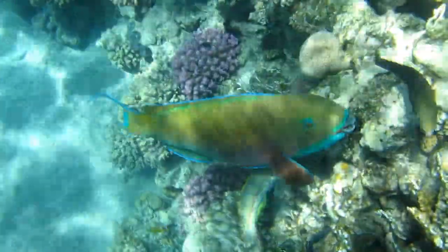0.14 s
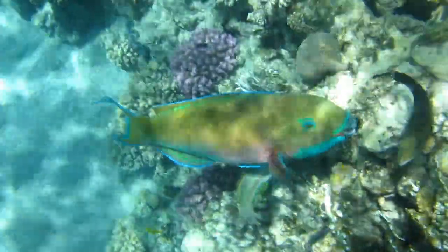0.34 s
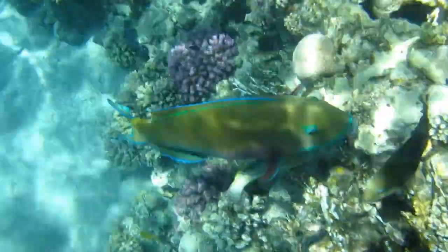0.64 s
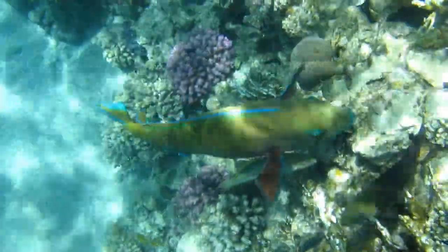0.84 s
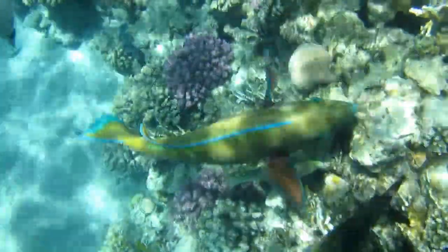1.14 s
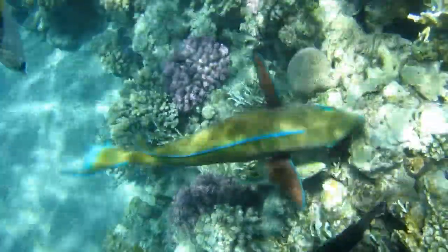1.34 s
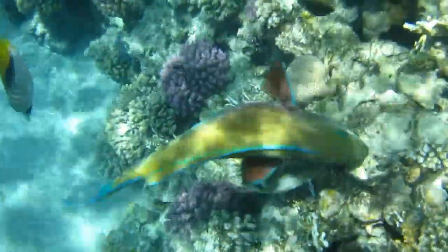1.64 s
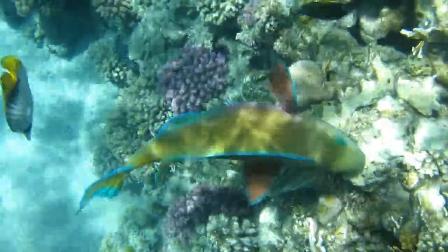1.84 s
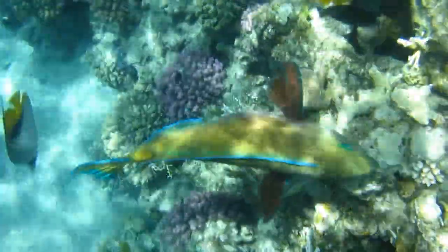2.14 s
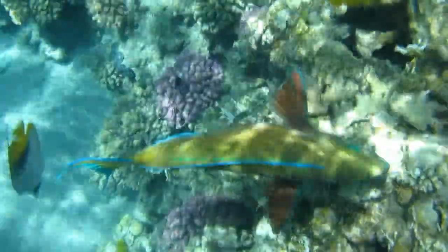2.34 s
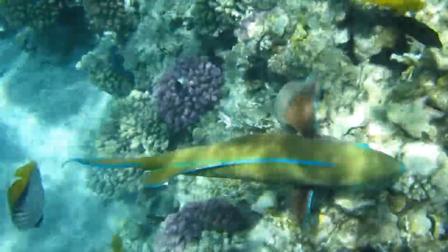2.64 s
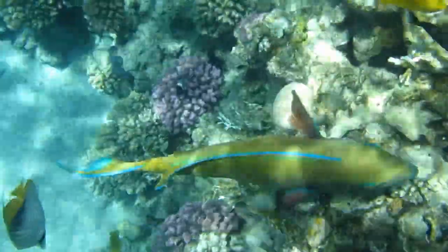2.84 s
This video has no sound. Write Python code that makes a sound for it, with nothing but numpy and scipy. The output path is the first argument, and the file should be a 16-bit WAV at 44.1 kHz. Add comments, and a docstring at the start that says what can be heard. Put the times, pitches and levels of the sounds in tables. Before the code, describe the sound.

A parrotfish bites coral twice underwater, gritty crunching knocks over low rumbling water and reef snaps

```python
"""Underwater at a reef: a parrotfish rasps coral twice, close to a camera in a housing.
Each bite is a run of knocks, as decaying modes, and gritty cracks, as band-coloured noise bursts.
Shaped noise and wandering tones make the moving water; swept low tones thump, and short damped sines
are small bubbles, soft plops and low knocks. Sharp snaps and a faint crackle come from the reef, over
a soft wash, a thin hiss, a hum and a whine. Grit, crackle and part of the hiss ring in the housing."""
import sys
import numpy as np
from scipy import signal
from scipy.fft import rfft, irfft, next_fast_len
from scipy.io import wavfile
from scipy.ndimage import map_coordinates

SR = 44100
rng = np.random.default_rng(int(sys.argv[2]) if len(sys.argv) > 2 else 0)


def bounce(signal):
    """Save signal as a 16-bit WAV file at the path given by the first command-line argument."""
    frames = np.transpose(np.atleast_2d(signal))
    limited = np.clip(frames, -1, 1)
    pcm = np.round(limited * 32767).astype(np.int16)
    wavfile.write(sys.argv[1], SR, pcm)


N = 130095


def amp(db):
    """Decibels to an amplitude ratio: 20 dB is a factor of ten."""
    return 10 ** (np.asarray(db) / 20)


def unit(x):
    """Normalisation to a root-mean-square of 1."""
    return x / np.sqrt(np.mean(x ** 2) + 1e-20)


def pan(db):
    """Interchannel level difference: left and right gains, left minus right in dB."""
    return amp(np.array([[db], [-db]]) / 2)


def curves(rows):
    """Linear interpolation in time: one value per sample for each column after the time."""
    times, *columns = np.transpose(rows)
    return [np.interp(np.arange(N) / SR, times, column) for column in columns]


def wobble(rate):
    """Band-limited fluctuation: a smooth curve through random knots, rate of them a second."""
    knots = rng.standard_normal(int(N * rate / SR) + 4)
    return map_coordinates(knots, [np.arange(N) * rate / SR])


def filtered(x, response):
    """Linear filtering: the spectrum of x times a response of frequency."""
    n = x.shape[-1]
    padded = next_fast_len(2 * n)
    spectrum = rfft(x, padded) * response(np.fft.rfftfreq(padded, 1 / SR))
    return irfft(spectrum, padded)[..., :n]


def noise(colour, side_db):
    """Partially coherent stereo noise of rms 1: shaped mid and side, silent above the last point."""
    f, db = np.transpose(colour)

    def response(hz):
        return amp(np.interp(np.log(hz + 1), np.log(f), db)) * (hz < f[-1])
    mid, side = filtered(rng.standard_normal((2, N)), response)
    side = amp(side_db) * side
    return unit(np.array([mid + side, mid - side]))


def add(track, s, sound):
    """Superposition: mix a short sound in at s seconds."""
    start = max(0, round(s * SR))
    part = track[..., start:start + sound.shape[-1]]
    part += sound[..., :part.shape[-1]]


def gurgle(hz):
    """Frequency and amplitude modulation: an eddy's low tone wanders in pitch and swells."""
    pitch = hz * 2 ** (.17 * wobble(13) + .1 * wobble(70))
    return unit(amp(2.77 * wobble(32.13)) * np.sin(2 * np.pi * np.cumsum(pitch) / SR))


# strength of the water flow: t/s, relative level/dB
FLOW_STRENGTH = [(0, -24.5), (.17, -27), (.21, -24.5), (.42, -22), (.62, -21), (.74, -22.5), (.95, -19.5),
                 (1.13, -17), (1.26, -19), (1.42, -18), (1.6, -17.5), (1.7, -18.5), (1.84, -19.5),
                 (1.88, -24), (2.1, -24.5), (2.2, -34), (2.33, -27.5), (2.45, -29), (2.55, -29),
                 (2.7, -26.5), (2.84, -24), (2.95, -29)]
# spectra of slow surge, deep rumble and churn: f/Hz, relative density level/dB per Hz
SURGE_COLOUR = [(15, -28.5), (42, -2), (65, 6.5), (120, -39.5), (300, -64)]
RUMBLE_COLOUR = [(15, -10), (30, -25), (55, -20), (85, 3), (120, 0.5), (160, -8.5), (200, -16),
                 (270, -36.5), (400, -46), (800, -81.5)]
CHURN_COLOUR = [(60, -13), (130, 2.5), (190, -0.5), (240, -2), (290, -21.5), (400, -28), (600, -24),
                (1200, -57.5)]
# gurgling eddies: centre f/Hz, level against the flow/dB
EDDIES = [(118, -6), (182, -10)]
FLOW_REF_DB = -20
SURGE_DB, CHURN_DB = -38, -10  # churn is against the flow reference
CHURN_GROWS, EDDIES_GROW = 2.5, 1.6  # dB per dB of flow: stronger flow is brighter
LOW_PAN_DB = -2.5  # left minus right


def water():
    """Flow noise past the housing: surge and rumble, with eddies and churn that grow faster."""
    flow_db, = curves(FLOW_STRENGTH)
    effort_db = flow_db - FLOW_REF_DB
    surge = amp(SURGE_DB + 2.6 * wobble(7.6)) * noise(SURGE_COLOUR, side_db=-30)
    deep = amp(effort_db - 6.5 + 2.2 * wobble(12)) * noise(RUMBLE_COLOUR, side_db=-37)
    churn_db = CHURN_DB + CHURN_GROWS * effort_db + 2.0 * wobble(25.02)
    churn = amp(churn_db) * noise(CHURN_COLOUR, side_db=-21)
    eddies = amp(EDDIES_GROW * effort_db) * sum(amp(db) * gurgle(hz) for hz, db in EDDIES)
    return (surge + amp(FLOW_REF_DB) * (deep + eddies + churn)) * pan(LOW_PAN_DB)


# housing resonances: f/Hz, width/Hz, relative left level/dB, relative right level/dB
HOUSING_MODES = [(1200, 393, 12, 3), (2197, 87, 0, 11), (2600, 1000, 1.5, -15), (3547, 120, -22.5, 8.5),
                 (4600, 315, 6.5, 4.5), (6300, 170, 4.5, -2.5), (7150, 410, -6.5, 1.5),
                 (8400, 110, -14.5, 3), (8510, 700, -9, 0.5), (15000, 1100, -67, -49.5)]
# treble lost through the housing wall: f/Hz, relative level/dB
WALL_LOSS = [(9500, 7), (11000, 0), (13000, -5), (15500, -6)]


def housing(x):
    """Modal superposition: band-pass resonances of the housing, weighted for each microphone."""
    def response(f):
        modes = 0
        for k, (centre, width, left, right) in enumerate(HOUSING_MODES):
            resonance = 1j * f * width / (centre * centre - f * f + 1j * f * width)
            modes = modes + (-1) ** k * amp([[left], [right]]) * resonance
        return unit(modes * amp(np.interp(f, *np.transpose(WALL_LOSS))))
    return filtered(x, response)


# background course: t/s, relative mid wash level/dB, relative hiss level/dB
BACKGROUND_COURSE = [(0.0, -51.5, -49.5), (0.54, -50, -51), (0.89, -51.5, -50), (1.13, -47, -50),
                     (1.26, -50, -51.5), (1.68, -51, -50.5), (1.86, -56, -59), (2.12, -55, -54.5),
                     (2.34, -56, -56), (2.95, -50.5, -52.5)]
# spectra of the wash, the hiss and a faint airy hiss above 8 kHz: f/Hz, relative density level/dB per Hz
WASH_COLOUR = [(120, -15), (270, 7), (330, 4), (385, -4), (480, 0.5), (680, -3), (950, -10), (1300, -9.5),
               (1800, -23), (3500, -68)]
HISS_COLOUR = [(500, -28.5), (1200, 7), (2100, 11), (3300, 9), (3900, 4.5), (4700, 5.5), (7000, 4),
               (9200, -3.5), (10500, -10), (12000, -46), (16000, -21)]
AIR_COLOUR = [(8000, -20), (10500, 5), (12200, -1), (16000, 0)]
AIR_DB = -32  # against the hiss course


def background():
    """Stationary noise under slow gains: wash and partly ringing hiss drop after the hard bite."""
    wash_db, hiss_db = curves(BACKGROUND_COURSE)
    wash = amp(wash_db + 4.0 + 0.44 * wobble(18)) * noise(WASH_COLOUR, side_db=-1) * pan(-0.61)
    direct = amp(-5.0) * noise(HISS_COLOUR, side_db=2.0)
    ringing = amp(-6.5) * unit(housing(noise(HISS_COLOUR, side_db=-3.0)))
    air = amp(AIR_DB) * noise(AIR_COLOUR, side_db=0)
    return wash + amp(hiss_db) * (direct + ringing + air)


# faint whine of the camera's electronics: f/Hz, level/dB
WHINE_TONES = [(2009, -75), (15734, -89)]


def whine():
    """Pure tones: thin, steady sines from the camera itself."""
    t = np.arange(N) / SR
    return sum(amp(db) * np.sin(2 * np.pi * hz * t) for hz, db in WHINE_TONES)


CRACK_T60_S, TAIL_T60_S = .007, .025
TAIL_DB, SCATTER_DB = -17, 9  # tail against the fast decay; scatter energy against the pulse


def crack():
    """Impulse and decaying scatter: a sharp pulse, then noise that differs at each microphone."""
    t = np.arange(SR // 20) / SR
    decay = amp(-60 * t / CRACK_T60_S) + amp(TAIL_DB - 60 * t / TAIL_T60_S)
    scatter = rng.standard_normal((2, len(t))) * decay
    scatter = scatter / np.linalg.norm(scatter, axis=1, keepdims=True)
    burst = (t == 0) + amp(SCATTER_DB) * scatter
    # 0.5 ms of lead-in: zero-phase filters also spread a pulse ahead
    burst = np.pad(burst, ((0, 0), (SR // 2000, 0)))
    return burst / np.linalg.norm(burst, axis=1, keepdims=True) * np.sqrt(10)


def tinted(x, hz, octaves, broad_db):
    """Spectral emphasis: a band above a broad base, at a fixed energy per channel."""
    def response(f):
        return amp(broad_db) + np.exp(-(np.log2((f + 1) / hz) / octaves) ** 2)
    y = filtered(x, response)
    return 2 * y / np.linalg.norm(y, axis=1, keepdims=True)


# colour of a snap through the housing wall: f/Hz, relative level/dB
SNAP_COLOUR = [(200, -20.5), (1000, -0.5), (4700, 3.5), (6500, -12.5), (9200, -7.5), (12500, -24.5),
               (15000, -23)]
SNAP_WIDTH_OCT, SNAP_BROAD_DB = 0.25, -39


def snap(crack_db, ring_db, hz):
    """Broadband transient plus narrow-band ringing: a dry crack and one brief coloured band."""
    burst = crack()
    broad = filtered(burst, lambda f: amp(np.interp(f, *np.transpose(SNAP_COLOUR))))
    broad = 2 * broad / np.linalg.norm(broad, axis=1, keepdims=True)
    ring = tinted(burst, hz, SNAP_WIDTH_OCT, SNAP_BROAD_DB)
    return amp(crack_db) * broad + amp(ring_db) * ring


# near snaps: t/s, relative crack level/dB, relative ring level/dB, ring f/Hz, left minus right/dB
REEF_SNAPS = [(.074, -25, -50, 8900, 7.5), (.2013, -36, -35, 4760, 4.5), (0.29, -33, -29, 6260, -1),
              (0.3703, -37.5, -41, 4680, -2), (0.4769, -34.5, -31, 5900, 8),
              (0.64, -32.5, -35.5, 9000, 2.5), (0.7027, -40.5, -32.5, 5800, -6),
              (.73, -38, -36.5, 6580, 8.5), (0.775, -36.5, -39.5, 7100, 10.5),
              (1.3262, -29, -35, 6600, 2.5), (1.3578, -33, -38.5, 3700, 10.5), (2.082, -37, -50, 6900, -1),
              (2.1095, -55, -40, 6700, 3), (2.1227, -23, -35.5, 8830, -3), (2.131, -38, -45.5, 4200, 0.5),
              (2.1904, -51, -32.5, 7000, 5.5), (2.334, -28, -41, 8800, -1.5),
              (2.4341, -33.5, -34, 6400, -0.5), (2.561, -42, -34.5, 3350, -2),
              (2.794, -41, -39.5, 7140, 0.5)]
CRACKLE_PER_S, CRACKLE_FLOOR_DB = 90, -59


def reef():
    """Random impulsive sources: near snaps, likely of shrimp, over a far crackle."""
    near, far = np.zeros((2, N)), np.zeros((2, N))
    for s, crack_db, ring_db, hz, pan_db in REEF_SNAPS:
        add(near, s, pan(pan_db) * snap(crack_db, ring_db, hz))
    for when, size, side in rng.random((int(CRACKLE_PER_S * N / SR), 3)):
        level_db = CRACKLE_FLOOR_DB + 9.5 * size ** 2
        add(far, when * N / SR, amp(level_db) * pan(8 * (side - .5)) * crack())
    return near + housing(far)


# small bubbles, soft plops and low knocks: t/s, f/Hz, level before onset and decay/dB
BUBBLES_AND_KNOCKS = [(.0505, 487, -17.5), (.236, 440, -27.5), (.305, 415, -32), (.512, 750, -30),
                      (.848, 1200, -30), (0.9652, 283, -13.5), (.987, 990, -29.5), (1.346, 1030, -30.5),
                      (1.55, 544, -27), (2.123, 910, -28), (2.134, 493, -31.5), (2.682, 470, -40)]
DECAY_CYCLES, ONSET_S = 11.5, 0.00083  # cycles to die by 60 dB; onset time constant


def bubbles_and_knocks():
    """Damped oscillation: each bubble or knock rings at its own frequency for a few cycles."""
    out, t = np.zeros(N), np.arange(SR // 10) / SR
    rise = 1 - np.exp(-t / ONSET_S)
    for s, hz, db in BUBBLES_AND_KNOCKS:
        decay = amp(db - 60 * t * hz / DECAY_CYCLES)
        add(out, s, decay * rise * np.sin(2 * np.pi * hz * t))
    return out * pan(-1.2)


# faint hum that comes and goes: t/s, rms level/dB
HUM_COURSE = [(.08, -78), (.2, -51), (.33, -65), (.47, -47.5), (.65, -54.5), (.75, -45.5), (.81, -92)]
HUM_HZ = 332


def hum():
    """Slow frequency modulation: a faint, wavering hum before the first bite."""
    level_db, = curves(HUM_COURSE)
    pitch = HUM_HZ * (1 + .008 * wobble(10))
    return amp(level_db) * unit(np.sin(2 * np.pi * np.cumsum(pitch) / SR))


# low thumps on the housing: t/s, relative level/dB, settling f/Hz
THUMP_EVENTS = [(0.196, -17.5, 89), (.609, -14, 127), (1.322, -13.5, 126), (1.406, -14, 118.6),
                (1.575, -13.5, 152), (1.76, -5, 115), (1.779, -2, 86), (1.825, -6.5, 98.3),
                (2.294, -21.5, 84), (2.389, -12, 80.3), (2.412, -19, 113.3), (2.465, -20, 89.6),
                (2.659, -12.5, 115), (2.686, -13.5, 80)]
THUMP_RISE_S, THUMP_T60_S = 0.01, 0.069
THUMP_EXTRA_HZ, THUMP_SAG_S = 66.1, 0.0049  # extra pitch at the start; its decay time constant


def thumps():
    """Transient low-frequency oscillation: pushes of water, a few cycles that sag in pitch."""
    out, t = np.zeros(N), np.arange(SR // 6) / SR
    shape = (1 - np.exp(-t / THUMP_RISE_S)) * amp(-60 * t / THUMP_T60_S)
    for s, db, hz in THUMP_EVENTS:
        pitch = hz + THUMP_EXTRA_HZ * np.exp(-t / THUMP_SAG_S)
        add(out, s, amp(db) * shape / shape.max() * np.sin(2 * np.pi * np.cumsum(pitch) / SR))
    return out * pan(LOW_PAN_DB)


# modes a contact knocks with, before random spread: f/Hz, relative level/dB, t60/s
KNOCK_MODES = [(203, 10, 0.05), (310, 6.5, 0.022), (440, -5.5, 0.051), (736, -13, 0.028),
               (1152, -15, 0.028), (1440, -38.5, 0.059)]


def knock():
    """Modal excitation: damped modes, scattered slightly in level and frequency."""
    t = np.arange(SR // 12) / SR
    ring = 0
    for k, (f, db, t60) in enumerate(KNOCK_MODES):
        decay = amp(db + rng.normal(0, 2.54) - 60 * t / t60)
        ring = ring + (-1) ** k * decay * np.sin(2 * np.pi * f * rng.normal(1, 0.049) * t)
    return ring * (1 - np.exp(-t / 0.00034))


SCRAPE_BODY_DB, SCRAPE_BODY_HZ = 8.5, 1390  # weight of the grit's low part; its corner


def scrape(n):
    """Granular friction: n samples of fast-fluctuating noise with a raised low part."""
    grains = rng.standard_normal((2, n)) * amp(4 * wobble(700)[:n])
    grains = filtered(grains, lambda f: 1 + amp(SCRAPE_BODY_DB) / (1 + (f / SCRAPE_BODY_HZ) ** 4))
    return unit(grains) * signal.windows.tukey(n, .5)


# tooth contacts: t/s, relative knock level/dB, relative crack level/dB, brightest f/Hz
TOOTH_CONTACTS = [(0.951, -36, -35.5, 3600), (0.9634, -26.5, -40.5, 4700), (1.033, -34, -36, 5500),
                  (1.044, -26, -37, 5000), (1.0648, -21.5, -36, 5130), (1.085, -20.5, -40.5, 4700),
                  (1.111, -46, -32.5, 4670), (1.1251, -29, -32.5, 4750), (1.136, -38, -41, 4700),
                  (1.153, -28.5, -34.5, 8900), (1.1701, -20, -25.5, 7000), (1.176, -21.5, -34, 4700),
                  (1.1823, -25.5, -28, 3280), (1.191, -27, -33.5, 2980), (1.739, -22, -47, 5000),
                  (1.762, -29, -47.5, 5070), (1.775, -24, -42.5, 4930), (1.785, -11.5, -26, 10160),
                  (1.79, -31, -29, 2300), (1.802, -34, -39.5, 3000), (1.808, -32, -48, 5050),
                  (1.823, -24.5, -48, 3830), (1.8295, -27, -44.5, 3740)]
# teeth dragging over the coral: t/s, length/s, relative level/dB
TOOTH_SCRAPES = [(1.037, 0.029, -55), (1.063, .035, -57.5), (1.166, 0.021, -44.5), (1.717, 0.048, -55.5),
                 (1.787, 0.078, -61.5)]
CHIP_WIDTH_OCT, CHIP_BROAD_DB = 0.22, -7


def bites():
    """Impact and friction: tooth contacts knock and crack, and grit crumbles as the teeth drag."""
    knocks, grit = np.zeros(N), np.zeros((2, N))
    for s, knock_db, crack_db, hz in TOOTH_CONTACTS:
        add(knocks, s, amp(knock_db) * knock())
        add(grit, s, amp(crack_db) * tinted(crack(), hz, CHIP_WIDTH_OCT, CHIP_BROAD_DB))
    for s, length, db in TOOTH_SCRAPES:
        add(grit, s, amp(db) * scrape(int(length * SR)))
    return knocks * pan(-2.6) + housing(grit)


def scene():
    """Linear superposition of every source."""
    ambience = water() + background() + whine() + reef()
    return ambience + bubbles_and_knocks() + hum() + thumps() + bites()


TOP_HZ = 16200


def record(dry):
    """Saturation and band limiting: the camera rounds peaks towards full scale, then cuts the top."""
    rounded = dry / (1 + np.abs(dry) ** 8) ** (1 / 8)
    return filtered(rounded, lambda hz: hz < TOP_HZ)


dry = scene()
out = record(dry)
bounce(out)
```